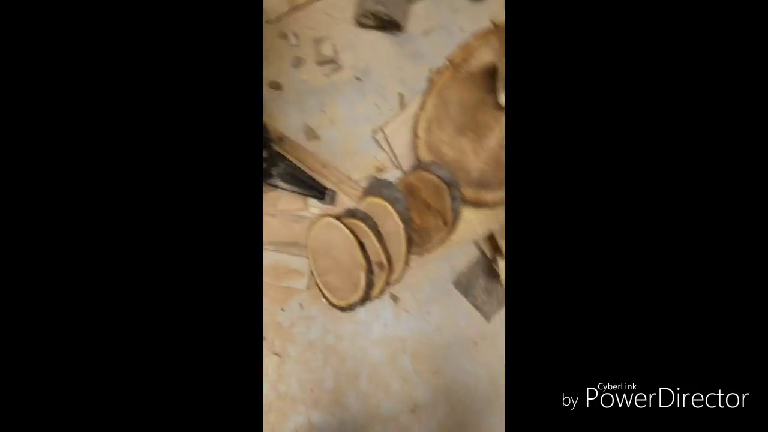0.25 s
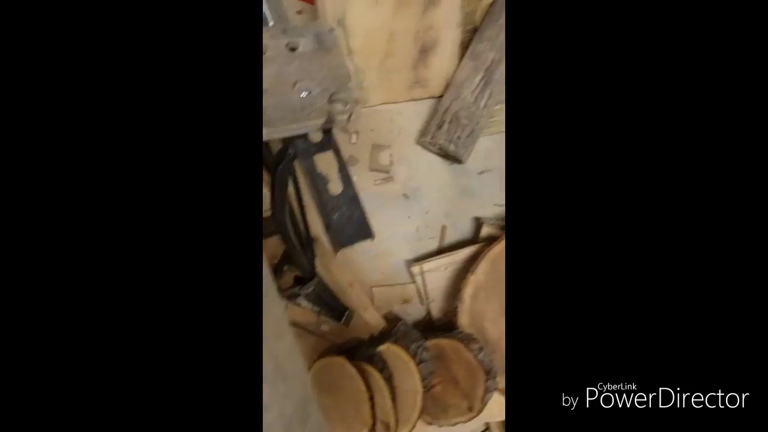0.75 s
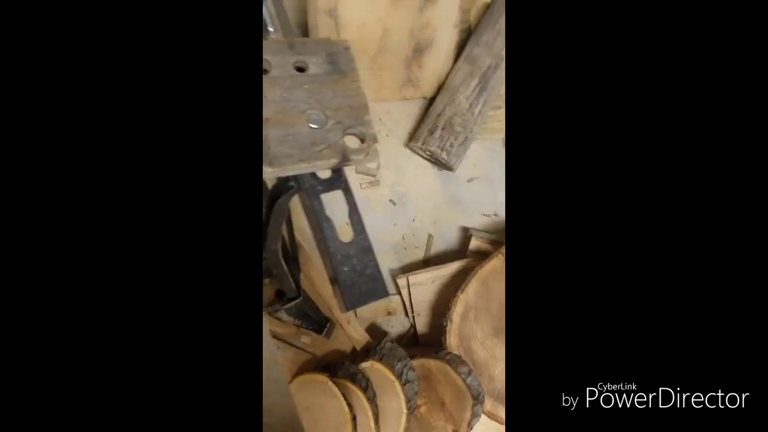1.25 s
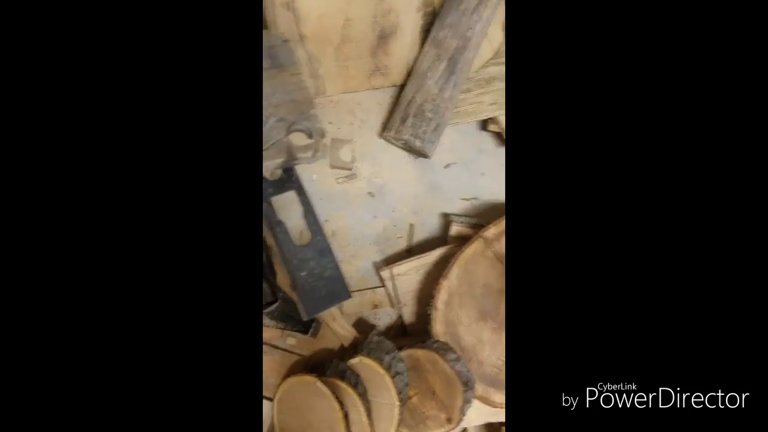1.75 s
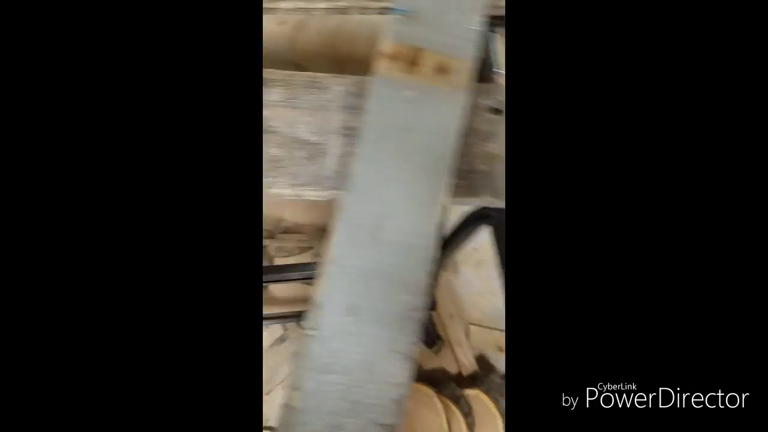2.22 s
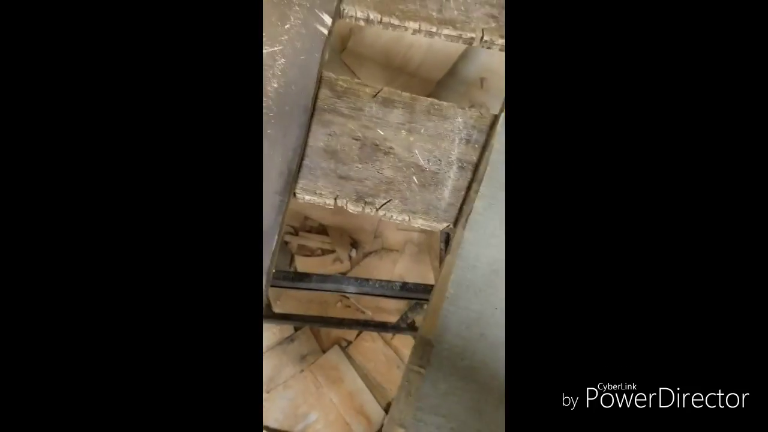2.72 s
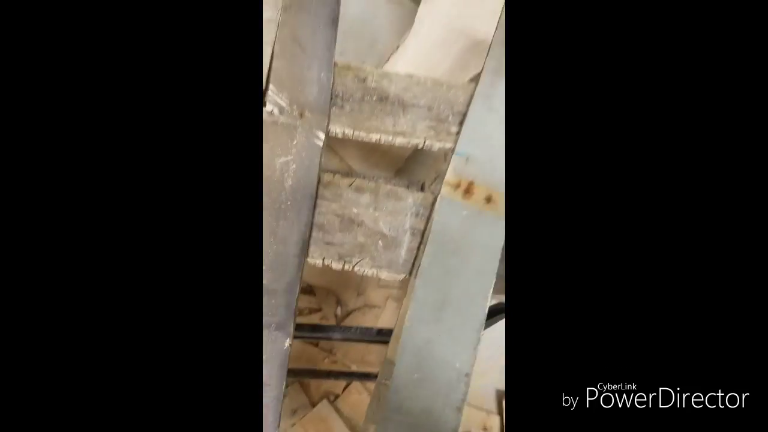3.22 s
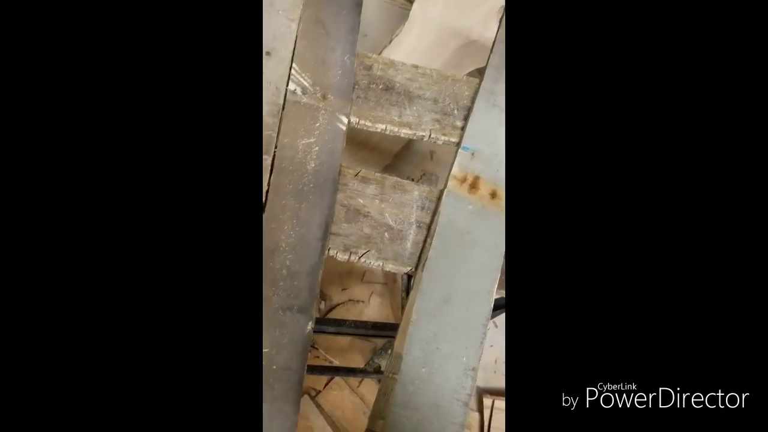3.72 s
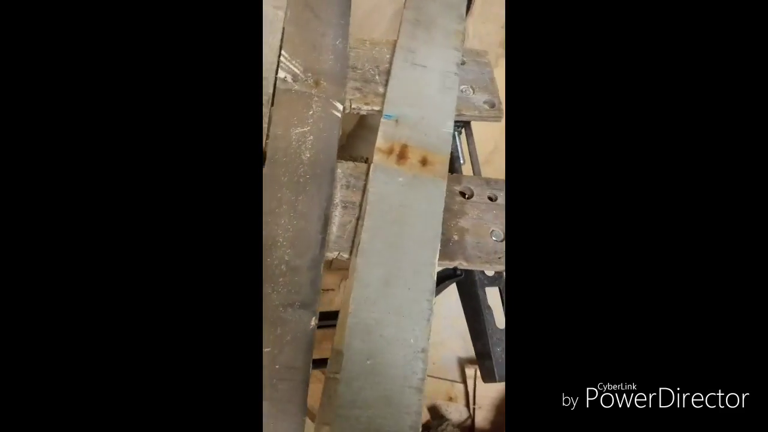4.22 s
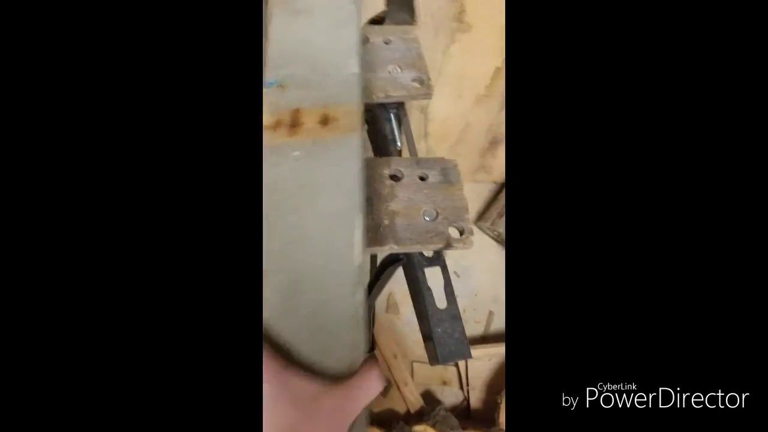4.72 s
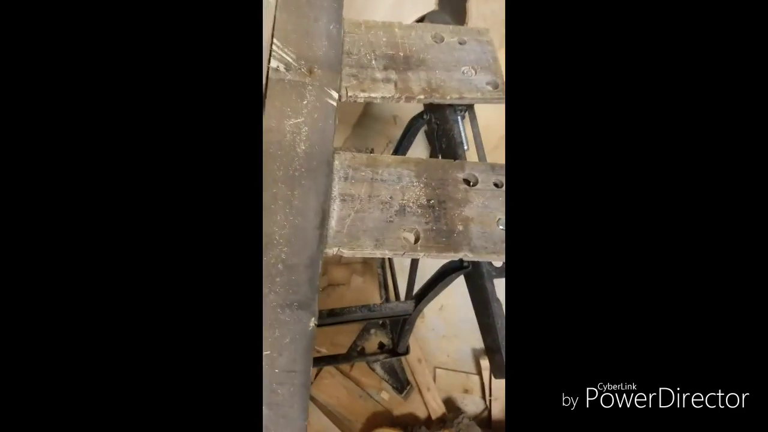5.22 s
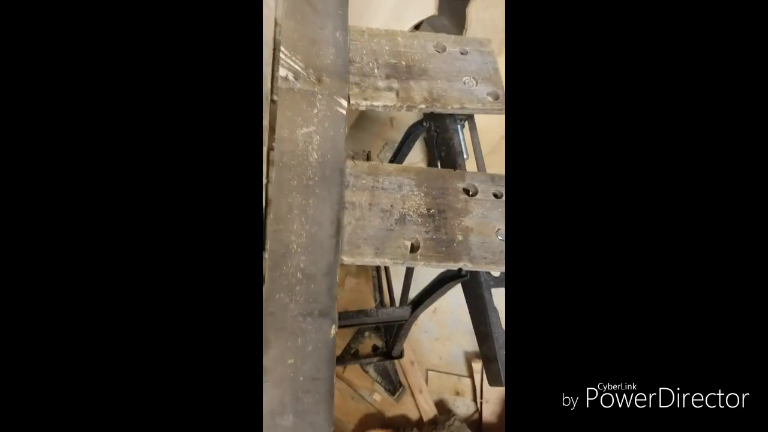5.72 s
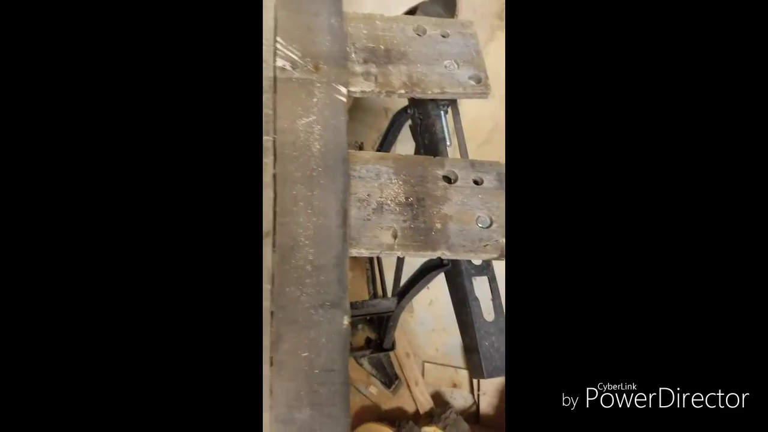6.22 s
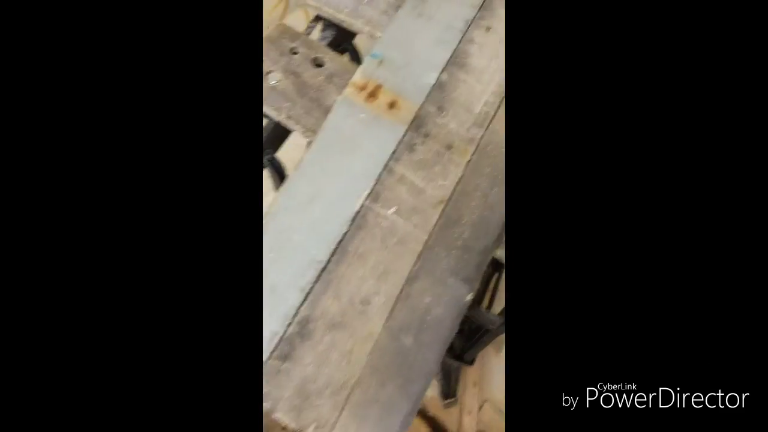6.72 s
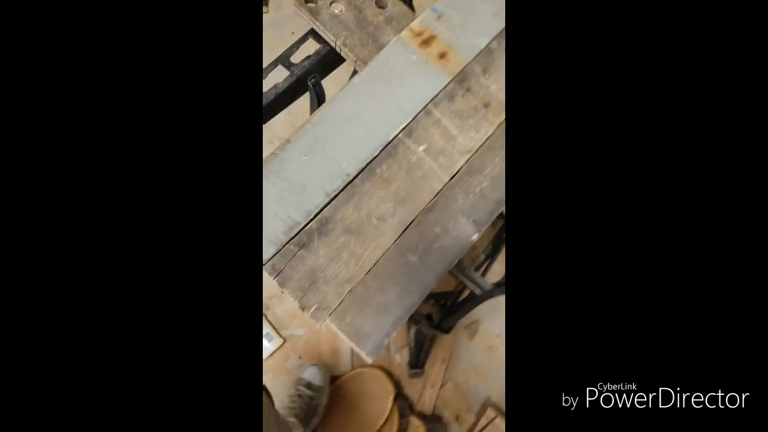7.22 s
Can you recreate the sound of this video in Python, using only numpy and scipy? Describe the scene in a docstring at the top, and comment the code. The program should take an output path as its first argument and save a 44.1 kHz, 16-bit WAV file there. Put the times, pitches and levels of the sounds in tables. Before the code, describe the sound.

Close stereo pickup of weathered planks in a small, hard garage. Short woody knocks come irregularly, with gritty scraping between them. The dragging thickens near four seconds, then two hard claps of board on bench land in quick succession, clearly the loudest. After a quieter gap with tiny wood squeaks, one board slides past close and bright, and soft knocks finish over handling rumble, faint hum and hiss.

```python
"""A light knock and a hissy scrape open a run of dry wooden boards dragged from a pile, knocked together
and dropped on a bench in a garage. Each knock is a short crack that rings the board's modes and the room.
Random catches of fibre and grit make the rubbing between knocks, with slides, squeaks and thin rustles.
Low rumble, hum and hiss lie beneath; two microphone ports a few centimetres apart pick it all up."""
import sys
import numpy as np
from scipy import signal
from scipy.fft import rfft, irfft
from scipy.io import wavfile

SR = 44100
rng = np.random.default_rng(int(sys.argv[2]) if len(sys.argv) > 2 else 0)


def generate_wav(sig):
    """Save sig (samples, or channels by samples) to the path in sys.argv[1] as 16-bit PCM at SR."""
    pcm = np.round(np.clip(np.atleast_2d(sig).T, -1, 1) * 32767).astype(np.int16)
    wavfile.write(sys.argv[1], SR, pcm)


N = 328897   # length in samples, about 7.5 s

# knocks of board on board or bench, levels ahead of edge smear and pan: (start_s, peak_db,
# thud_db lift of the lows, snap_db lift of the highs, room_db feed re direct, pitch_ratio of the board,
# tone_hz of the struck spot, tone_db its lift or dip)
KNOCKS = [(0.001, -21.5, 10.5, 18.5, 8, 0.8, 810, -8), (0.698, -38.5, 11, 5, 5.5, 1.14, 4670, -3),
          (0.791, -31.5, -3.5, -3, 6, 1.06, 2090, 3), (0.836, -33, 16, 7, -8, 1.2, 890, 11),
          (0.977, -33.5, 7.5, 12, 12.5, 0.83, 1065, 15.5), (1.194, -24, 8, 14.5, 7, 1.7, 3330, 16),
          (1.225, -34, -9, 13, 12.5, 0.65, 1400, 13), (1.298, -22, 6, 3.5, 4, 1.12, 3940, 2),
          (1.31, -19.5, -1, -0.5, 9, 1.3, 4030, 0.5), (1.437, -33, 10, 5, 2, 1.07, 1360, 18),
          (1.893, -43, -15, 7, 6, 1.01, 2100, 1), (1.991, -35, -6, 8, 11.5, 1.17, 2270, 11),
          (2.028, -24.5, -18, 4, -2, 1.2, 2310, 2), (2.064, -12.5, 0.5, -9, -1.5, 1.01, 3830, 1),
          (2.557, -11.5, 1.5, 6.5, 10.5, 1.26, 3280, 6), (2.695, -18.5, -9.5, 5, 6, 1.2, 2730, -2),
          (2.79, -27, -6, 16, 0, 1, 2600, 3), (2.938, -18.5, 3, 6, 7.5, 1.03, 1287, 8),
          (3.294, -31.5, 10.5, -4, 6.5, 1.07, 1640, 11), (3.463, -44.5, 13, 15, 10.5, 1.03, 4040, 14),
          (3.506, -26, 3, 16.5, 1.5, 1.3, 3000, 8), (3.686, -41.5, -12, 7.5, 12.5, 0.74, 2880, 6),
          (3.767, -21, -0.5, 0, 5, 1, 2160, 2), (4.194, -21.5, -9, 4.5, 7.5, 1.3, 2560, -5),
          (4.351, -25, 7.5, -16, 3.5, 1.45, 1200, 6.5), (4.432, -39, 10, 9, -15, 1.1, 2720, 27),
          (4.526, -40.5, 1, 7.5, 8.5, 2.1, 1480, 5), (4.632, -31, 17, 11, -10, 0.65, 3420, 10),
          (4.738, -25.5, 6.5, -18, -0.5, 1.12, 1100, 9.5), (5.152, -4, -3.5, 7.5, 11, 1.0, 2230, 1.5),
          (5.322, -4, -4, 5, 9.5, 0.97, 2220, 2.5), (5.375, -18, 10, 9.5, 7.5, 1.08, 930, 4),
          (5.502, -17.5, 4, 5.5, 6.5, 1.02, 990, 11), (5.578, -38, -9, 13, 10, 0.57, 950, 22),
          (5.754, -36.5, 11, 18, 3.5, 1.5, 1690, 1), (6.508, -24, -4, 24.5, 2, 0.64, 3720, 30),
          (6.675, -35, -18, 12, -17, 1.5, 4700, 16), (6.806, -31, 14.5, 13, 3, 0.777, 800, 12),
          (6.84, -35.5, 12, 7, -1, 0.706, 750, 0), (7.114, -26, -6, -14, -21, 1.5, 2310, 11),
          (7.358, -39, -10.5, 9.5, 6, 1.15, 1130, 3), (7.44, -32, 21, 9, 12.5, 1.19, 1240, 14.5)]


def one_knock(thud_db, snap_db, pitch_ratio, tone_hz, tone_db, ring_db=-39.5, hollow=0.52, spread_db=7.0):
    """One sharp contact sets the board's modes ringing, each with a new strength, more so with thud; peak 1."""
    # modes that ring in each knock, at pitch ratio 1: (pitch_hz, level_db re each other, t60_s)
    board_modes = [(211, -2.5, 0.015), (547, -7.5, 0.09), (630, -8.5, 0.047), (895, -2.5, 0.041),
                   (1060, 0.5, 0.017), (1609, -7.5, 0.11), (2126, -6.5, 0.11), (2190, -32, 0.072),
                   (2840, -14, 0.051), (3400, -2, 0.023), (3920, -4.5, 0.02), (4380, -5.5, 0.014)]
    # spectrum given to every crack, with a steady resonance near 560 Hz: (pitch_hz, level_db relative, per Hz)
    crack_spectrum = [(50, -119), (200, -19), (400, -10.5), (560, -1), (800, -6), (1600, -2.5),
                      (3000, -1.5), (5000, -10.5), (8000, -22), (13000, -32), (16000, -38)]
    t = np.arange(int(.12 * SR)) / SR
    mode_hz, mode_db, t60_s = np.transpose(board_modes)[:, :, None]
    mode_db = ring_db + hollow * thud_db + mode_db + spread_db * rng.standard_normal(mode_hz.shape)
    decay = from_db(mode_db - 60 * t / t60_s)
    struck = np.sum(decay * np.cos(2 * np.pi * pitch_ratio * mode_hz * t), axis=0)
    struck[0] += 1   # the contact itself
    # flat landings lift the bass, hard corners the treble; each spot lifts or dips one broad tone
    contact = [(700, thud_db), (1300, 0.021), (4500, 0), (7000, snap_db), (14000, 1.34 * snap_db)]
    spot = [(tone_hz / 1.18, 0), (tone_hz, tone_db), (tone_hz * 1.4, 0)]
    hit = struck
    for spectrum in (crack_spectrum, contact, spot):
        hit = colour(hit, spectrum, size=1024)
    return hit / np.max(np.abs(hit))


def knocks(scatter_s=0.0011, scatter_db=-12.5):
    """The direct sound, smeared by the nearest edges, and what feeds the room."""
    out = np.zeros((2, N + SR))
    for start_s, peak_db, thud_db, snap_db, room_db, *board in KNOCKS:
        hit = one_knock(thud_db, snap_db, *board)
        edge_decay = np.exp(-np.arange(200) / SR / scatter_s)
        edges = from_db(scatter_db) * rng.standard_normal(200) * edge_decay
        edges[0] = 1
        edges = edges / np.sqrt(np.sum(edges ** 2))
        near = np.convolve(hit, edges)[:len(hit)]
        start = round(start_s * SR)
        out[:, start:start + len(hit)] += from_db([[peak_db], [peak_db + room_db]]) * [near, hit]
    return out[:, :N]


def rubbing():
    """Coarse, sparse catches of rough boards dragged on the pile."""
    # drags, levels ahead of the mix: (loudest_s, rise_s, fall_s, rasp_db,
    # drone_db re rasp, hiss_db of the grit re rasp)
    drags = [(0.0, .05, 0.053, -49, -3, 9), (0.17, 0.57, 0.18, -53, -1, -6),
             (0.34, 0.11, 0.049, -63.5, 7, -2), (0.72, 0.19, .22, -60, -5, -0.5),
             (1.04, 0.17, 0.2, -53.5, -1.5, -3), (1.18, 0.21, 0.074, -45.5, -8.5, -6.5),
             (1.26, 0.073, 0.064, -48.5, 2.5, -14), (1.34, 0.11, 0.039, -56, -17, -15),
             (1.489, 0.11, .07, -55, 1.5, -9), (1.8, 0.71, 0.3, -80.5, 13.5, -12),
             (2.07, 0.17, 0.087, -58, 4, -2), (2.54, 0.18, .05, -60.5, -2.5, -9.5),
             (2.71, 0.06, 0.075, -42.5, -6.5, -12.5), (3.01, 0.16, 0.065, -64, 10.5, 2.5),
             (3.141, 0.029, .22, -55, -1.5, -5), (3.39, 0.16, 0.19, -63, 6.5, -8),
             (3.68, 0.31, 0.3, -60, 4, -11), (3.808, 0.18, 0.046, -50, 3, -2),
             (4.061, 0.12, 0.13, -40, -7.5, -7), (4.13, 0.093, 0.068, -41, -1.5, -10),
             (4.219, 0.12, 0.093, -41, 0, -8), (4.62, .06, 0.18, -61, -9, -5),
             (4.82, 0.13, .3, -64.5, -1, -11), (5.349, 0.06, 0.069, -35, -20, -4),
             (5.54, 0.13, 0.068, -64, 16.5, 2.5), (5.93, 0.26, 0.1, -55.5, -3, -4),
             (6.22, 0.25, 0.12, -53.5, -5, -7.5), (6.87, 0.21, 0.19, -59, 0.5, -3.5),
             (7.1, 0.36, 0.28, -59, 2, -3), (7.28, .12, 0.07, -57.5, 6, -4.5)]
    # tone of rough wood: (pitch_hz, level_db relative, per Hz)
    rub_spectrum = [(120, -29), (200, -7), (235, -4), (291, -10.5), (368, -8.5), (608, 1), (1020, -10),
                    (1200, -1.5), (1810, -6), (2990, -2.5), (10900, -23), (13300, -20), (14500, -22)]
    loudest_s, rise_s, fall_s, rasp_db, drone_db, hiss_db = np.transpose(drags)
    gains = [swells(zip(loudest_s, rise_s, fall_s, rasp_db + re_db)) for re_db in (drone_db, 0, hiss_db)]
    return zones(gains, rub_spectrum, per_s=3000, uneven_db=5.0, judder_db=3.5)


def sweep():
    """Slides close to the ports: dense catches, bright and nearly dry."""
    # slides, levels ahead of the mix: (loudest_s, rise_s, fall_s, hiss_db, drone_db re hiss, rasp_db re hiss)
    slides = [(0.768, 0.12, 0.41, -49, -4, 0.5), (6.471, 0.23, 0.13, -34.5, -2, -0.5)]
    # tone of the close slide: (pitch_hz, level_db relative, per Hz)
    slide_spectrum = [(150, -62), (250, -41), (346, -16.5), (384, -15.5), (455, -11.5), (589, -3.5),
                      (761, -7.5), (1340, -11), (3000, -8.5), (4150, -7.5), (5650, -14), (7060, -0.5),
                      (13300, -22), (15000, -13)]
    loudest_s, rise_s, fall_s, hiss_db, drone_db, rasp_db = np.transpose(slides)
    gains = [swells(zip(loudest_s, rise_s, fall_s, hiss_db + re_db), power=1.6, sag_db=9.5)
             for re_db in (drone_db, rasp_db, 0)]
    return zones(gains, slide_spectrum, per_s=12000, uneven_db=-0.5, judder_db=1.0)


def squeak():
    """Uneven slips of wood on wood excite two narrow resonances."""
    # faint squeaks, levels ahead of the mix: (loudest_s, rise_s, fall_s, low_tone_db, high_tone_db)
    squeaks = [(5.924, 0.022, 0.084, -64, -67), (6.15, 0.1, 0.035, -55, -64), (6.23, .04, 0.047, -58, -67)]
    tones_hz, width_hz = (1736, 3800), 65
    slips = rng.standard_normal(N) * from_db(6.6 * drift(25))
    loudest_s, rise_s, fall_s, *levels_db = np.transpose(squeaks)
    out = 0
    for tone_hz, level_db in zip(tones_hz, levels_db):
        tone = rms_one(band(slips, tone_hz - width_hz / 2, tone_hz + width_hz / 2))
        out = out + swells(zip(loudest_s, rise_s, fall_s, level_db), power=2.5) * tone
    return out


def rustle():
    """Thin, uneven noise in one narrow treble band."""
    # rustles, levels ahead of the mix: (loudest_s, rise_s, fall_s, level_db)
    rustles = [(0.2, .2, 0.21, -66), (3.35, 0.25, 0.13, -62), (7.0, 0.22, 0.19, -72)]
    centre_hz, width_hz = 5070, 540
    noise = rng.standard_normal(N) * from_db(2.5 * drift(30))
    return swells(rustles) * rms_one(band(noise, centre_hz - width_hz / 2, centre_hz + width_hz / 2))


def zones(gains, spectrum, per_s, uneven_db, judder_db):
    """Drone, rasp and hiss: fibres and grit catch at random, in uneven sizes, and judder together."""
    # the bands of drone, rasp and hiss: (low_hz, high_hz)
    zone_edges = [(200, 1000), (1000, 5000), (5000, 16000)]
    judder = from_db(judder_db * drift(22))
    out = 0
    for gain, (low_hz, high_hz) in zip(gains, zone_edges):
        sizes = from_db(uneven_db * np.minimum(rng.exponential(1, N), 5)) * rng.choice([-1, 1], N)
        catches = sizes * (rng.random(N) < per_s / SR)
        grain = colour(catches, spectrum) * judder
        out = out + gain * rms_one(band(grain, low_hz, high_hz))
    return out


def swells(rows, power=1.195, sag_db=2.0):
    """Gain of (loudest_s, rise_s, fall_s, level_db) rows: sloping quarter sines, overlaps adding in power."""
    t = np.arange(0, N, 32) / SR   # one point every 32 samples
    energy = 0
    for loudest_s, rise_s, fall_s, level_db in rows:
        rise = 1 + (t - loudest_s) / max(rise_s, .05)   # no rise is quicker than 50 ms
        fall = 1 - (t - loudest_s) / fall_s
        ramp = np.clip(np.minimum(rise, fall), 0, 1)
        # power sets how pointed the swell is
        shape = np.sin(np.pi / 2 * ramp) ** power
        energy = energy + (from_db(level_db - sag_db * (1 - ramp)) * shape) ** 2
    return np.interp(np.arange(N) / SR, t, np.sqrt(energy))


def garage(x, build_s=0.00065, lumpy_db=-0.5):
    """Reflections build up in a few ms, come in lumps and die band by band; mean energy 1 a side."""
    # decay of the room: (pitch_hz, t60_s)
    room_decay = [(100, 0.5), (260, 0.28), (700, 0.3), (1800, 0.35), (5000, 0.36), (13000, 0.26)]
    t = np.arange(int(.7 * SR)) / SR
    response = diffuse(len(t), lambda hz: from_db(-60 * t / at_hz(room_decay, hz)))
    lumps = np.interp(t, np.arange(350) * .002, rng.standard_normal(350))   # a new lump every 2 ms
    response = response * (1 - np.exp(-(t / build_s) ** 2)) * from_db(lumpy_db * lumps)
    response = response / np.sqrt(np.sum(response ** 2) / 2)
    return signal.fftconvolve(x[None], response, axes=1)[:, :N]


def ports(x, pan_db):
    """A direct sound at the two ports; positive pan is louder on the left."""
    return np.array([late(x) * from_db(pan_db / 2), x * from_db(-pan_db / 2)])


def late(x, left_lag_s=0.0001974):
    """Direct sound reaches the left port a little later."""
    return np.interp(np.arange(N) - left_lag_s * SR, np.arange(N), x)


def rumble():
    """Lumpy low noise, partly each port's own: swells of handling and a dying thump after each knock."""
    # low rumble of handling and steps, levels ahead of the lumps: (loudest_s, rise_s, fall_s, level_db)
    handling = [(0.0, .02, 0.16, -57), (0.23, 0.15, 0.066, -48), (0.3, 0.044, 0.55, -65),
                (1.02, 0.11, .12, -65.5), (1.31, 0.072, 0.07, -56.5), (2.58, .03, 0.1, -58.5),
                (3.28, 0.12, 0.39, -62.5), (3.78, 0.9, 0.09, -57.5), (4.22, 0.11, 0.12, -69),
                (5.6, 0.076, 0.68, -67), (6.46, 0.32, 0.11, -68), (6.9, 0.051, 0.78, -63.5)]
    # every knock shakes the bench; follows is the share of the knock's dB
    thump_db, follows, thump_t60_s = -49, 0.84, 0.31
    shared, own = rng.standard_normal(N), rng.standard_normal((2, N))
    thumps = np.zeros(N)
    for start_s, peak_db, *_ in KNOCKS:
        thumps[round(start_s * SR)] = from_db(thump_db + follows * peak_db)
    # a one-pole decay turns each impulse into a dying gain
    thumps = signal.lfilter([1], [1, -from_db(-60 / thump_t60_s / SR)], thumps + 1e-18)
    lumps = from_db(2.0 * drift(15))
    return (swells(handling) + thumps) * lumps * rms_one(band(shared + 1.1 * own, 69, 222))


def background():
    """Steady wide hiss and a wavering low hum: noise in a narrow band, the same at both ports."""
    # tone of the hiss: (pitch_hz, level_db relative, per Hz)
    air_spectrum = [(26, -18), (45, 8), (53, -8), (123, 2.5), (173, -10.5), (262, 2.5), (586, 4),
                    (932, -2.5), (1760, -2.5), (3850, -8), (11300, -23.5), (13100, -26), (15500, -17)]
    hiss_db, hum_db = -63, -71.5
    hum_hz, hum_width_hz = 177.1, 10
    hiss = rms_one(diffuse(N, lambda hz: from_db(at_hz(air_spectrum, hz))))
    hum = rms_one(band(rng.standard_normal(N), hum_hz - hum_width_hz / 2, hum_hz + hum_width_hz / 2))
    return from_db(hiss_db) * hiss + from_db(hum_db) * hum


def diffuse(size, gain):
    """Stereo noise in half-octave bands, alike in the bass and not in the treble; gain(hz) shapes each."""
    # likeness of diffuse sound at the spaced ports: (pitch_hz, left_right_likeness from -1 to 1)
    port_likeness = [(60, 0.7), (130, 0.93), (290, 0.93), (640, 0.68), (1410, -0.09), (3100, -0.28),
                     (6820, -0.07), (15000, 0.04)]
    edges_hz = 25 * 2 ** np.arange(0, 9.6, .5)
    white = rng.standard_normal((2, 2, size))   # neighbouring bands use different noise
    out = 0
    for k, (low_hz, high_hz) in enumerate(zip(edges_hz, edges_hz[1:])):
        band_pass = signal.butter(2, [low_hz, high_hz], "band", fs=SR, output="sos")
        mid, side = signal.sosfilt(band_pass, white[k % 2])
        centre_hz = np.sqrt(low_hz * high_hz)
        alike = np.clip(at_hz(port_likeness, centre_hz), -1, 1)
        stereo = np.sqrt(1 + alike) * mid + np.sqrt(1 - alike) * side * [[1], [-1]]
        out = out + gain(centre_hz) * stereo
    return out


def colour(x, spectrum, size=4096):
    """Causal filter of the given spectrum (minimum phase from the folded cepstrum)."""
    bins_hz = np.arange(1, size // 2 + 2) * SR / size
    cepstrum = irfft(np.log(from_db(at_hz(spectrum, bins_hz))))
    cepstrum[1:size // 2] *= 2
    cepstrum[size // 2 + 1:] = 0
    return signal.fftconvolve(x, irfft(np.exp(rfft(cepstrum))))[:len(x)]


def band(x, low_hz, high_hz):
    """Steep band-pass."""
    return signal.sosfilt(signal.butter(3, [low_hz, high_hz], "band", fs=SR, output="sos"), x + 1e-18)


def drift(rate_hz):
    """Slow random wander with spread 1, computed every 40 samples."""
    r = np.exp(-80 * np.pi * rate_hz / SR)
    # the first 2000 points let the filter settle
    slow = signal.lfilter([1], [1, -2 * r, r * r], rng.standard_normal(N // 40 + 2002))[2000:]
    return np.interp(np.arange(N) / 40, np.arange(len(slow)), rms_one(slow))


def at_hz(points, hz):
    """A table read on a log-frequency axis."""
    return np.interp(np.log(hz), np.log(np.array(points)[:, 0]), np.array(points)[:, 1])


def from_db(db):
    """Gain of a level in dB."""
    return 10 ** (np.asarray(db) / 20)


def rms_one(x):
    """Scaled to rms 1."""
    return x / np.sqrt(np.mean(x ** 2) + 1e-20)


def scene():
    """Direct knocks, rubbing and slides, their reflections, rumble and background."""
    near, far = knocks()
    strokes = rubbing() + squeak() + rustle()
    slide = sweep()
    direct = ports(near, 5.5) + from_db(-5.5) * ports(strokes, -5.5) + ports(slide, -7.0)
    room_feed = far + from_db(-0.5) * strokes + from_db(-7.5) * slide
    reflected = from_db([[-1.0], [1.0]]) * garage(room_feed)   # the right is a little louder
    return direct + reflected + rumble() + background()


def record(dry):
    """The top is cut steeply: 70 dB down from 16.3 kHz upward."""
    return signal.sosfilt(signal.cheby2(12, 70, 16300, fs=SR, output="sos"), dry)


dry = scene()
out = record(dry)
generate_wav(out)
```